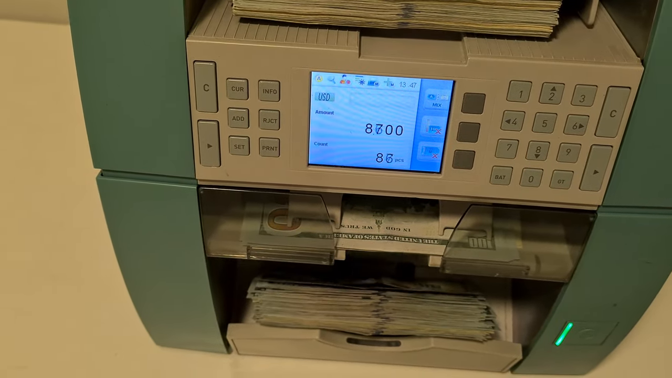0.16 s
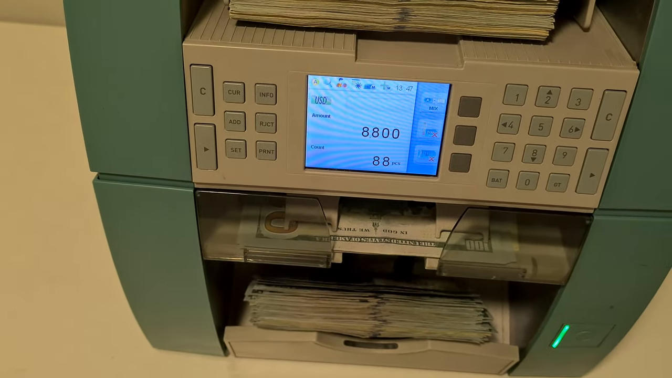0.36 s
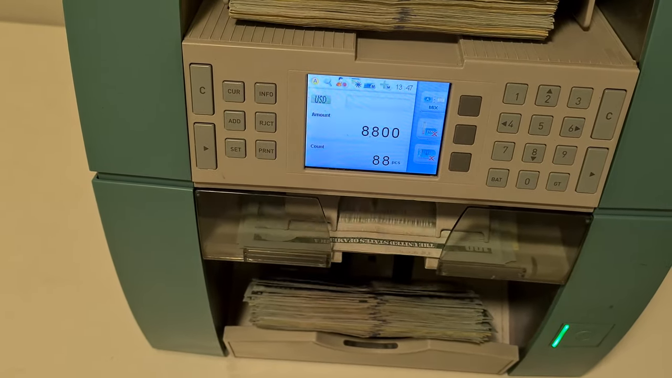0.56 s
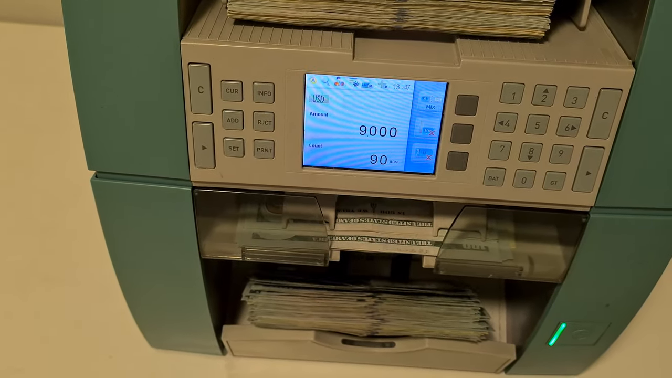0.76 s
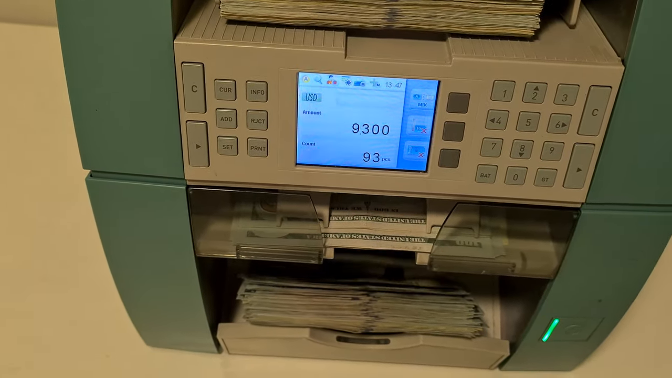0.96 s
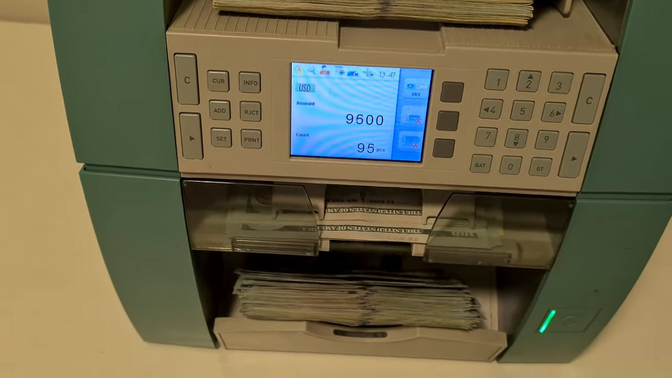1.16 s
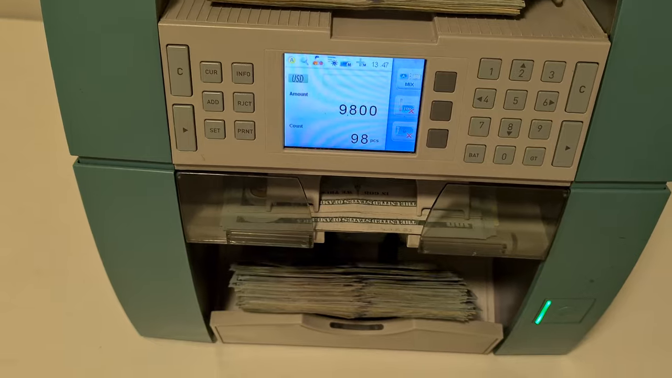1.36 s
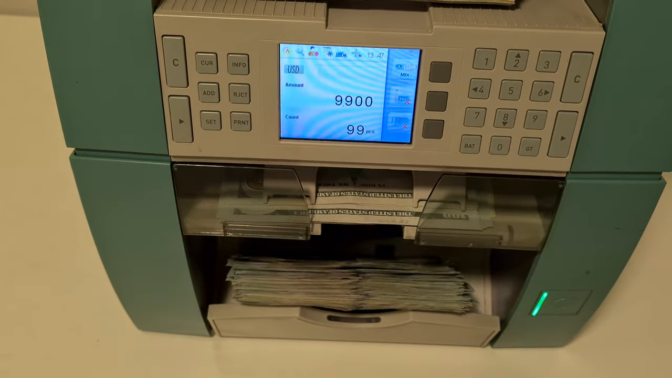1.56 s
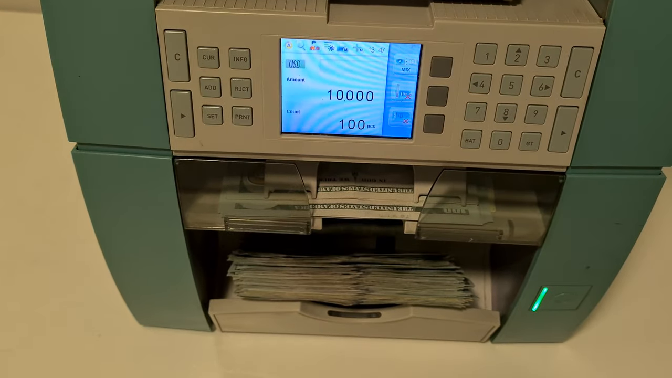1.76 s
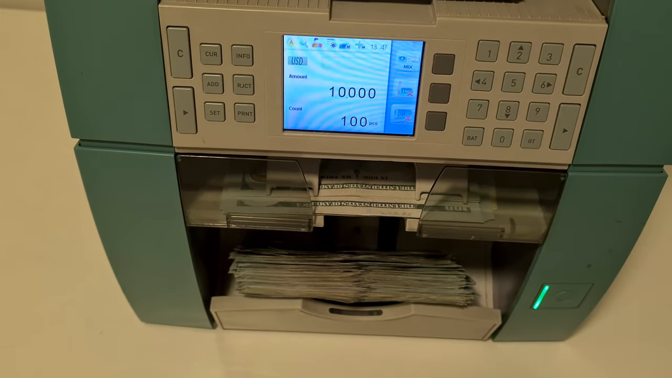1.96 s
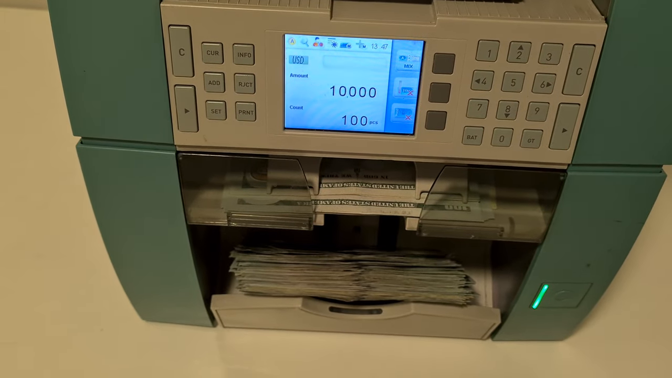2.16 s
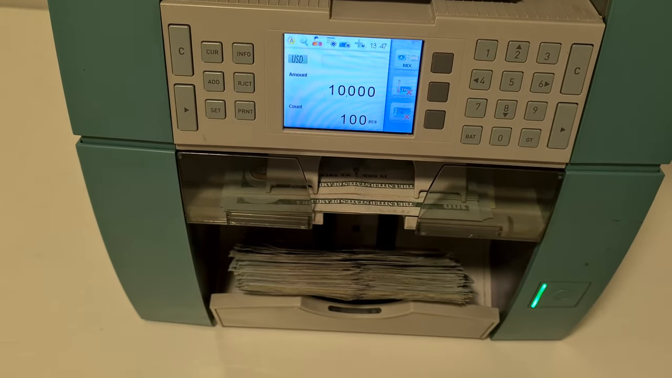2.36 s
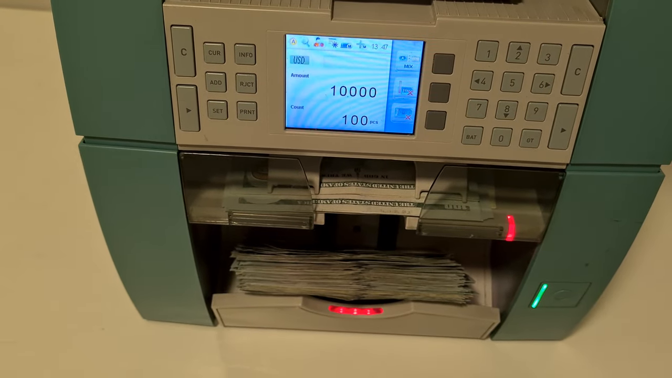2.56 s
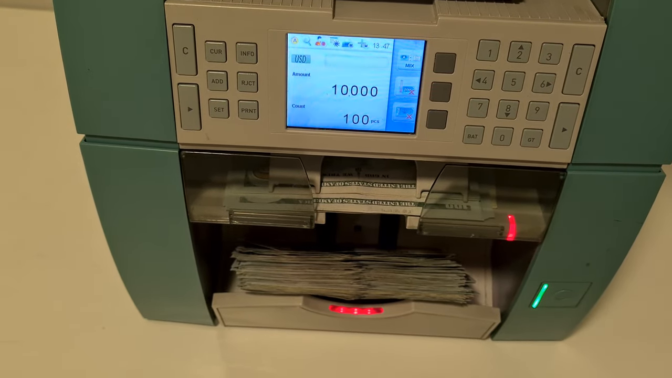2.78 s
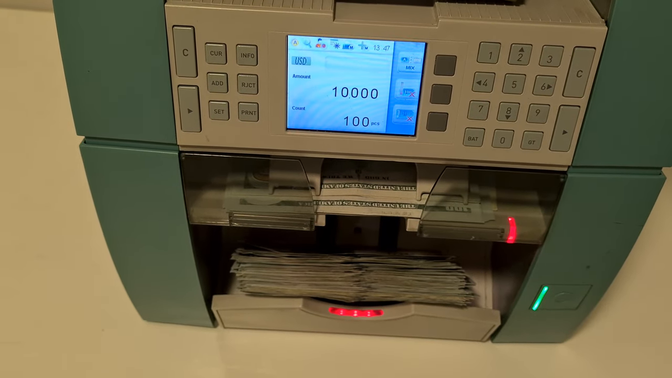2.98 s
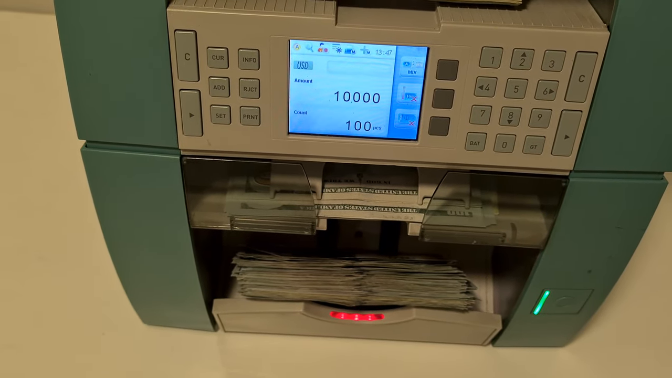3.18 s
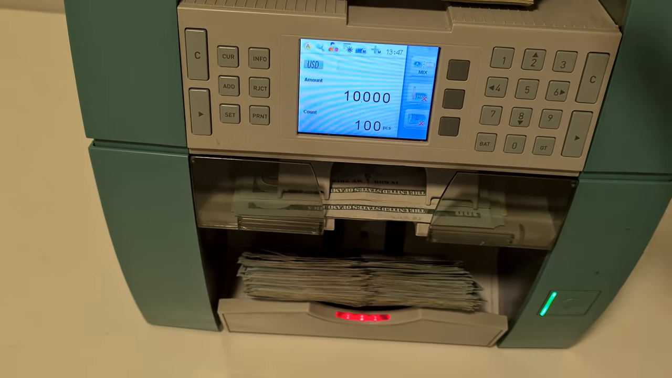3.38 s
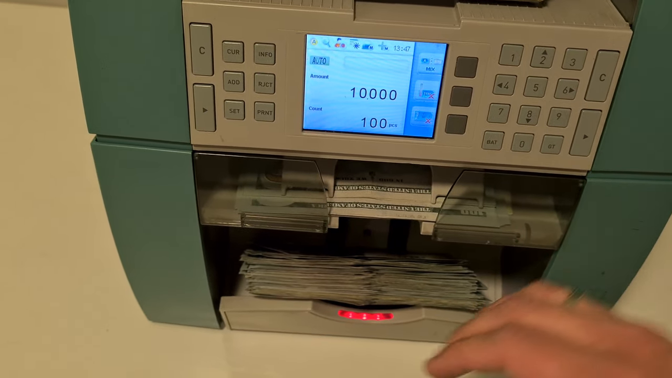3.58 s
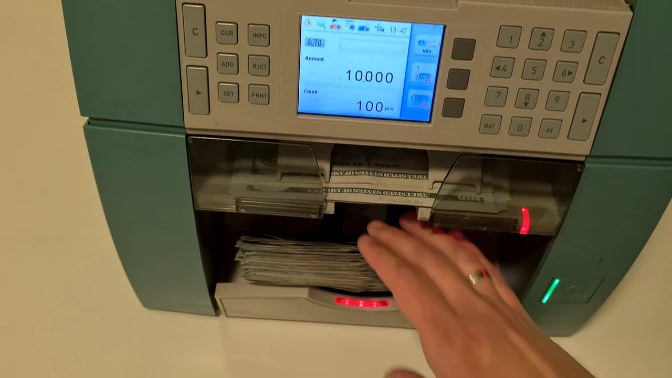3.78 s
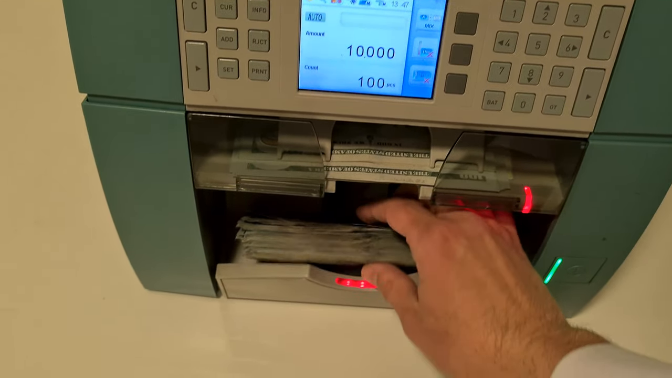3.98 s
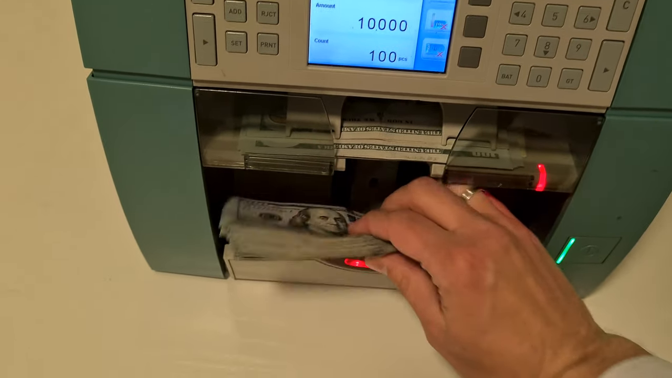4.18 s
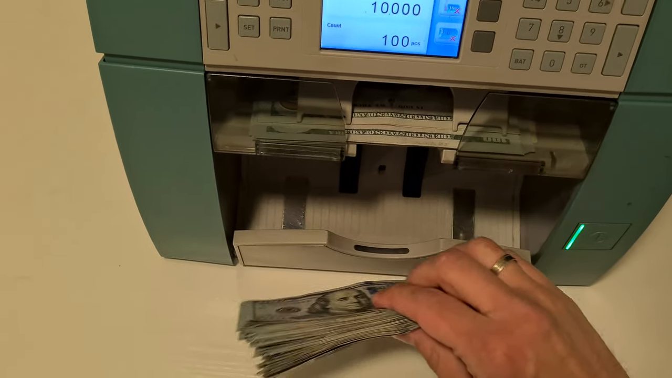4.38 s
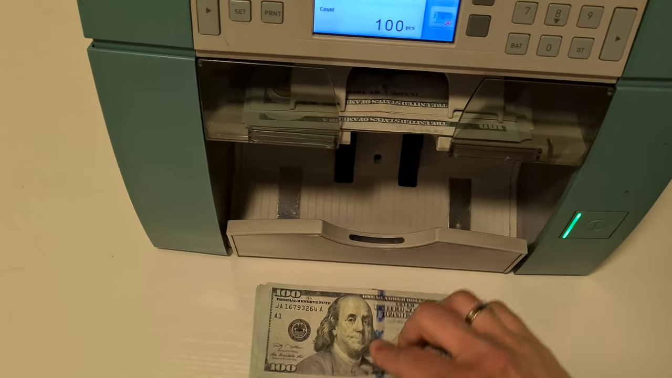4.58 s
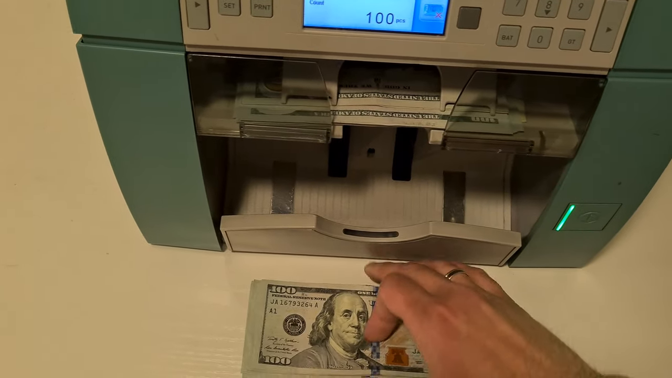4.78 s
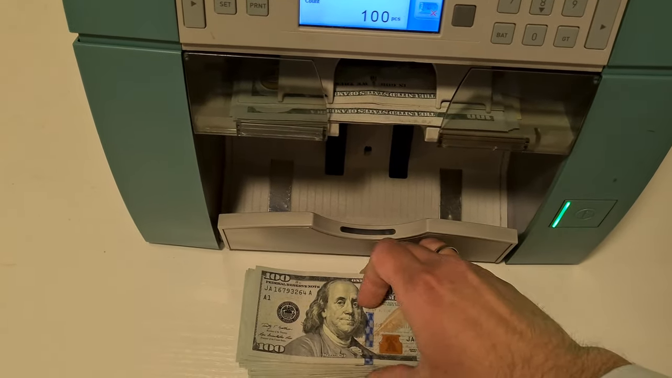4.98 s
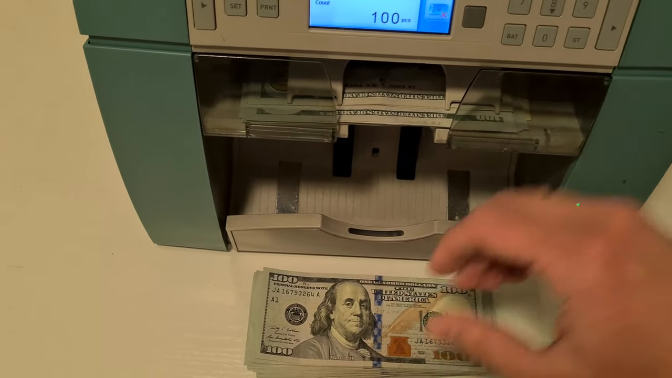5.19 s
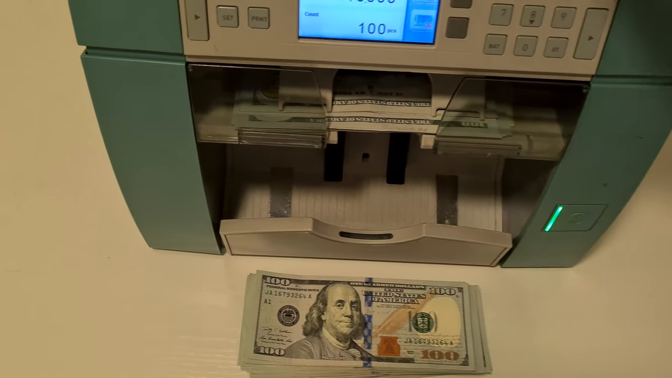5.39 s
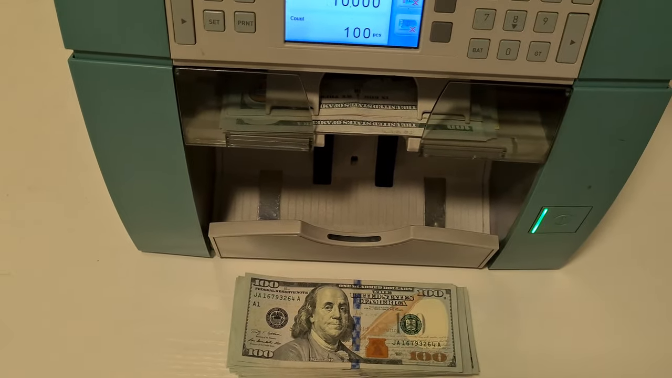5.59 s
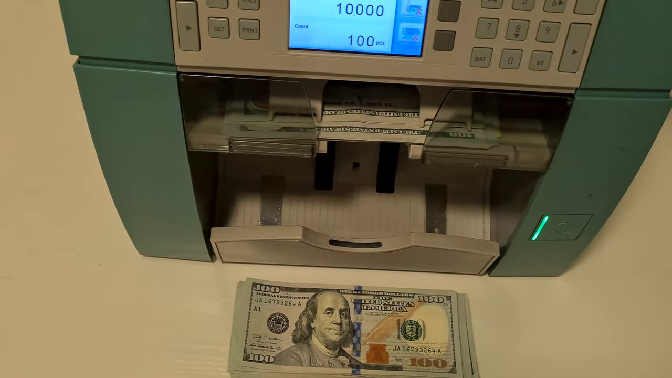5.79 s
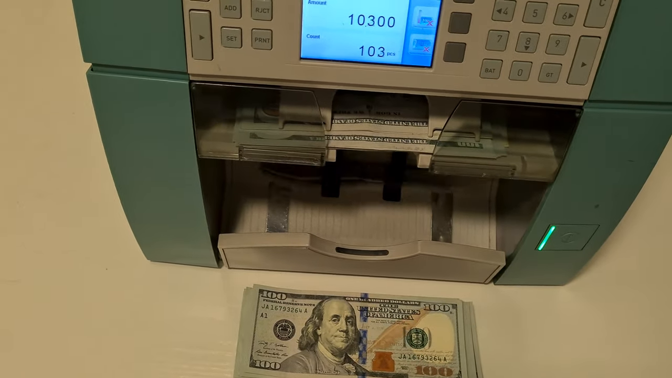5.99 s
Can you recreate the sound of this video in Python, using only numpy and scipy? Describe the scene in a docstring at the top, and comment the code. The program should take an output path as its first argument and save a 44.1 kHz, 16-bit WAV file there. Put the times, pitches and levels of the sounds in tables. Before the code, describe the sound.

In a quiet office with a soft ventilation hum, paper money riffles quickly through a nearby counting machine, each bill landing with a small thump over the whirring drive. The paper runs out and the motor winds down. Fingers tap the stack and bump it against the plastic tray, several sharp metallic clacks follow, then the motor spins up and bills rush through once more.

```python
"""Banknote counter in a quiet office

Gears rattle in a plastic case; each note flutters through, snaps past the rollers and thumps into the
stacker, and a metal gate clacks now and then. The batch ends; the drive idles and coasts to a stop,
a loose part ticking. A hand draws the bundle out, the desk booms softly, the gate clacks five times,
the drive restarts and notes run again. Ventilation rumbles throughout."""
import sys
import numpy as np
from scipy import signal
from scipy.fft import rfft, irfft, next_fast_len
from scipy.io import wavfile

SR = 44100
rng = np.random.default_rng(int(sys.argv[2]) if len(sys.argv) > 2 else 0)


def bounce(signal):
    """Save signal as a 16-bit WAV file at the path given by the first command-line argument."""
    frames = np.transpose(np.atleast_2d(signal))
    limited = np.clip(frames, -1, 1)
    pcm = np.round(limited * 32767).astype(np.int16)
    wavfile.write(sys.argv[1], SR, pcm)


N = 266364
TIME = np.arange(N) / SR
FFT_SIZE = next_fast_len(N + SR // 2, True)
HZ = np.maximum(np.arange(FFT_SIZE // 2 + 1) * SR / FFT_SIZE, 1)


def from_db(db):
    """Gain of a level in dB."""
    return 10 ** (np.asarray(db) / 20)


def at_hz(points):
    """A (Hz, value) table on the whole frequency grid."""
    return np.interp(np.log(HZ), np.log(np.array(points)[:, 0]), np.array(points)[:, 1])


def level(runs):
    """Gain over time from runs of (s, dB) points, silent outside them."""
    return sum(from_db(np.interp(TIME, *np.transpose(run), left=-150, right=-150)) for run in runs)


def drift(rate_hz):
    """Smooth random wander of standard deviation 1."""
    step = 16
    pole = np.exp(-2 * np.pi * rate_hz * step / SR)
    slow = signal.lfilter([1], [1, -2 * pole, pole * pole], rng.standard_normal(N // step + 3002))[3000:]
    return np.interp(np.arange(N) / step, np.arange(len(slow)), slow / slow.std())


def tone(hz, waver_hz, rate_hz):
    """A sine of rms 1 whose pitch wanders."""
    return np.sqrt(2) * np.sin(2 * np.pi * np.cumsum(hz + waver_hz * drift(rate_hz)) / SR)


def bursts(starts_s, db, rise_s, fall_s):
    """Envelope of contacts that rise linearly and decay exponentially."""
    out = np.zeros(N)
    for start_s, gain, decay_s in zip(starts_s, from_db(db), np.broadcast_to(fall_s, len(starts_s))):
        t = np.arange(round((rise_s + 8 * decay_s) * SR)) / SR
        shape = np.minimum(t / rise_s, 1) * np.exp(-np.maximum(t - rise_s, 0) / decay_s)
        piece = out[round(start_s * SR):][:len(t)]
        piece += gain * shape[:len(piece)]
    return out


def contacts(rough_db):
    """Two independent dense streams of tiny uneven contacts; rms 1."""
    grains = rng.standard_normal((2, N)) * from_db(rough_db * drift(500))
    return grains / grains.std()


# Stereo width. Each row: frequency in Hz, side minus mid in dB.
STEREO_WIDTH = [(60, -20.5), (110, -14), (200, -28), (380, -11), (700, -6.5), (1290, -2), (2380, -1.5),
                (4400, -0.5), (8120, 1.5), (15000, -0.5)]
# Stereo balance. Each row: frequency in Hz, left minus right in dB.
STEREO_BALANCE = [(60, -1), (110, -2.5), (200, -3), (380, -2), (700, -2.5), (1290, 1), (2380, 1),
                  (4400, 1.5), (8120, 2), (15000, -2)]

def colour(pair, spectrum, peaks=()):
    """Causal filter of unit noise gain; the two streams then become stereo mid and side."""
    db = at_hz(spectrum) + sum(lift / (1 + (2 * (HZ - hz) / width) ** 2) for hz, width, lift in peaks)
    cepstrum = irfft(db * np.log(10) / 20, FFT_SIZE)
    cepstrum[1:FFT_SIZE // 2] *= 2   # fold to minimum phase
    cepstrum[FFT_SIZE // 2 + 1:] = 0
    response = np.exp(rfft(cepstrum)) / np.sqrt(np.mean(from_db(db) ** 2))
    mid, side = rfft(pair, FFT_SIZE) * response
    side = side * from_db(at_hz(STEREO_WIDTH))
    tilt = from_db(at_hz(STEREO_BALANCE) / 2)
    return irfft([(mid + side) * tilt, (mid - side) / tilt], FFT_SIZE)[:, :N]


# Paper feed, one list a batch. Each row: time in seconds, flutter level in dB.
PAPER_FEED = [
    [(0.0, -14.5), (0.326, -20.5), (1.308, -20), (1.674, -32.5), (1.78, -38)],
    [(5.62, -34.5), (5.73, -22.5), (5.878, -16.5), (6.04, -21.5)],
]
# Banknotes, about 13 a second. Each row: start in seconds, leading snap, trailing snap and thump in dB.
BANKNOTES = [(0.051, -38, -28, -15), (.129, -19, -27, -9), (.202, -18.5, -30, -12.5),
             (.282, -16.5, -32.5, -9), (0.355, -35, -53, -9), (0.426, -38, -42, -31),
             (.514, -24.5, -35.5, -13.5), (0.591, -23.5, -32, -12.5), (0.664, -33, -26, -9),
             (.741, -16, -22.5, -10), (0.816, -17.5, -17, -12.5), (0.892, -14.5, -29.5, -11.5),
             (0.971, -18.5, -54, -10), (1.043, -22.5, -39, -11), (1.12, -19.5, -37, -9),
             (1.201, -17.5, -30, -11), (1.277, -22, -26.5, -13.5), (1.352, -15.5, -29, -8),
             (1.424, -23, -15, -18), (1.494, -22, -29, -20), (1.572, -19, -35, -14.5),
             (1.649, -17.5, -22, -12.5), (5.712, -16.5, -43.5, -14), (5.783, -18, -39.5, -7.5),
             (5.864, -14, -26.5, -16.5), (5.942, -23.5, -46, -13.5), (6.013, -14, -20, -20)]
# Plastic case resonances. Each row: frequency in Hz, width in Hz, lift in dB.
CASE_MODES = [(237, 48, 5), (304, 43, -0.5), (383, 32, 8.5), (447, 21, 6), (720, 120, 2), (858, 40, 2.5),
              (1345, 83, 6), (1750, 210, 4), (2036, 290, 4.5), (2850, 150, 1.5)]
# Paper flutter. Each row: frequency in Hz, relative density in dB.
FLUTTER_SPECTRUM = [(53, -27.5), (90, -9.5), (184, -17), (224, 3.5), (385, 1.5), (581, -13), (753, -3.5),
                    (1350, -9.5), (2430, -21.5), (11100, -27), (16000, -31)]

def paper_flutter():
    """Paper flutters through, swelling with each note; the loaded rollers whine."""
    feed = level(PAPER_FEED)
    pass_s, pass_lift_db = 0.03, 2.5
    corners_s = pass_s * np.array([-0.2, 0, 0.9, 1.3])
    passing = sum(np.interp(TIME, note[0] + corners_s, [0, 1, 1, 0]) for note in BANKNOTES)
    swell = from_db(1.18 * drift(32) + pass_lift_db * (passing - 0.5))
    flutter = colour(feed * swell * contacts(rough_db=3.5), FLUTTER_SPECTRUM, CASE_MODES)
    whine = feed * from_db(-24 + 2.8 * drift(5.9)) * tone(381, waver_hz=8.9, rate_hz=22)
    return flutter + whine


POWER_OFF_S, COAST_S, RESTART_S, SPIN_UP_S = 2.28, 0.46, 5.03, 0.1
WHINE_SAG = 0.12   # pitch follows speed to this power

def speed():
    """Roller speed, 0 to 1: full, slowing evenly, at rest, spinning up."""
    return np.clip(np.maximum(1 - (TIME - POWER_OFF_S) / COAST_S, (TIME - RESTART_S) / SPIN_UP_S), 0, 1)


def drive_gain(idle_db, restart_db, load_db, hold_s, fade_db_per_s, coast_db):
    """Gain of a drive layer: steady under power, shifted by paper load, faint while coasting."""
    unloaded_db, load_span_db = -33.5, 14
    load = np.clip((20 * np.log10(level(PAPER_FEED)) - unloaded_db) / load_span_db, 0, 1)
    powered = from_db(-fade_db_per_s * np.maximum(TIME - POWER_OFF_S - hold_s, 0))
    first_run = from_db(idle_db) * (powered + from_db(coast_db) * speed())
    second_run = from_db(restart_db) * speed() ** 1.23
    return np.where(TIME < RESTART_S, first_run, second_run) * from_db(load_db * load)


# Gear and belt rattle. Each row: frequency in Hz, relative density in dB.
RATTLE_SPECTRUM = [(260, -30), (450, -9.5), (589, -10.5), (794, -2), (1020, -11), (1360, -13),
                   (2160, -20.5), (3000, -16.5), (3280, -20), (4840, -25.5), (5710, -31), (9920, -33),
                   (15100, -42), (16000, -52)]
# Motor tones. Each row: frequency in Hz, level in dB relative to the rattle.
MOTOR_TONES = [(122.5, -20.5), (156, -17.5)]

def drive_rattle():
    """Gears and belts rattle the case; the motor hums under them."""
    gain = drive_gain(idle_db=-28.5, restart_db=-27, load_db=5,
                      hold_s=0.0087, fade_db_per_s=165, coast_db=-23.5)
    shaking = gain * from_db(0.68 * drift(25)) * contacts(rough_db=1.5)
    hum = sum(from_db(db) * tone(hz, waver_hz=1.456, rate_hz=3) for hz, db in MOTOR_TONES)
    return colour(shaking, RATTLE_SPECTRUM, CASE_MODES) + gain * hum


# Drive rumble. Each row: frequency in Hz, relative density in dB.
RUMBLE_SPECTRUM = [(53, -48), (90, -14.5), (113, -17), (173, -3.5), (235, 3), (270, 3), (550, -5),
                   (720, -23), (1210, -120)]

def drive_rumble():
    """The drive shakes the case with a rough rumble and a low whine."""
    gain = drive_gain(idle_db=-32, restart_db=-31, load_db=6,
                      hold_s=0.125, fade_db_per_s=600, coast_db=-19)
    shaking = gain * from_db(1.5 * drift(11)) * contacts(rough_db=5.5)
    whine = from_db(-5 + 1.35 * drift(19)) * tone(236 * speed() ** WHINE_SAG, waver_hz=3.13, rate_hz=11)
    return colour(shaking, RUMBLE_SPECTRUM, CASE_MODES) + gain * whine


# Gear mesh tones. Each row: full-speed frequency in Hz, waver in Hz, relative level in dB.
MESH_TONES = [(779, 8.99, -3), (1335, 8, -22), (2800, 60, -19)]

def gear_whine():
    """Gears whine at their mesh rates, sagging in pitch as they slow."""
    gain = drive_gain(idle_db=-31.5, restart_db=-30.5, load_db=-7,
                      hold_s=0.01, fade_db_per_s=600, coast_db=-40)
    whine = 0
    for hz, waver_hz, db in MESH_TONES:
        flicker = from_db(db + 2 * drift(13) + 2.6 * drift(40))
        whine += flicker * tone(hz * speed() ** WHINE_SAG, waver_hz, rate_hz=14.1)
    return gain * speed() ** 2 * whine


# Ventilation air. Each row: frequency in Hz, relative density in dB.
AIR_SPECTRUM = [(21, -35), (31, 0), (41, -10.5), (72, -9), (96, -12), (180, -28.5), (269, -21.5),
                (321, -27.5), (359, -16), (384, -24.5), (411, -19), (502, -27.5), (1070, -32), (1370, -38),
                (3210, -50.5), (7500, -68), (9750, -105), (16500, -120)]
# Fan peaks and dips. Each row: frequency in Hz, width in Hz, lift in dB.
FAN_PEAKS = [(143, 5.5, 5.5), (297.4, 8.3, 8), (386, 4.7, -3.5), (420, 14, -7.5), (626, 10, 11),
             (1084, 8.6, 13)]

def office():
    """Ventilation rumble with narrow fan tones over the building's deep hum."""
    air = from_db(-42.5 + 1.5 * drift(2.4)) * colour(rng.standard_normal((2, N)), AIR_SPECTRUM, FAN_PEAKS)
    hum = from_db(-50.5 + 1.1 * drift(2.5)) * tone(29, waver_hz=0.9, rate_hz=2.63)
    return air + hum * from_db([[-1.3], [1.3]])


# Notes slapping out of step. Each row: start in seconds, snap in dB, thump in dB.
STRAY_SLAPS = [(0.013, -21.5, -10.5), (0.325, -24.5, -25.5), (0.479, -15, -11), (0.779, -25.5, -9),
               (5.898, -29, -15)]
# Edge snap and stacker thump. Each row: frequency in Hz, relative density in dB.
SNAP_SPECTRUM = [(710, -19.5), (1200, 4.5), (2450, -17), (2890, -7.5), (5410, -16), (11100, -25),
                 (16000, -34)]
THUMP_SPECTRUM = [(65, -37), (110, -25), (226, -1.5), (386, 0.5), (571, -5.5), (751, -5.5), (1350, -9),
                  (2500, -22), (3250, -46.5), (5500, -120)]

def note_impacts():
    """Both edges of each note snap at the rollers; it lands in the stacker with a dull thump."""
    start_s, lead_db, trail_db, land_db = np.transpose(BANKNOTES)
    slap_s, slap_snap_db, slap_thump_db = np.transpose(STRAY_SLAPS)
    trail_s, land_s = start_s + 0.02, start_s + 0.0065
    scatter = rng.standard_normal((3, len(start_s)))
    midway_s = start_s + 0.043 + 0.0037 * scatter[0]   # a weak contact between notes

    snap_s = np.r_[start_s, trail_s, slap_s, midway_s]
    snap_db = np.r_[lead_db, trail_db, slap_snap_db, -33 + 5 * scatter[1]]
    snaps = bursts(snap_s - 0.003, snap_db, rise_s=0.0021, fall_s=0.0088) * contacts(rough_db=1.5)

    thump_s = np.r_[land_s, slap_s, midway_s]
    thump_db = np.r_[land_db, slap_thump_db, -26.5 + 5 * scatter[2]]
    thumps = bursts(thump_s, thump_db, rise_s=0.0044, fall_s=0.0071) * contacts(rough_db=2)
    return colour(snaps, SNAP_SPECTRUM) + colour(thumps, THUMP_SPECTRUM, CASE_MODES)


# Gate clacks. Each row: start in seconds, strike, ring and knock in dB, decay in seconds,
# 0 for closing or 1 for opening.
GATE_CLACKS = [(.342, -20.5, -34, -19.5, 0.018, 0), (0.645, -27.5, -20, -20, 0.029, 1),
               (4.506, -18.5, -43, -16.5, 0.021, 0), (4.552, -21, -37, -17.5, 0.017, 1),
               (4.641, -19.5, -41, -16.5, 0.026, 0), (4.734, -22.5, -19, -16.5, 0.017, 1),
               (4.823, -17, -37, -16, 0.02, 0), (5.845, -21.5, -21, -13, 0.016, 1)]
# Housing knock and bright crack. Each row: frequency in Hz, relative density in dB.
KNOCK_SPECTRUM = [(71, -45), (120, -7), (307, -4), (449, -3), (585, -10), (1290, -3.5), (1760, -11.5),
                  (2070, -12), (4000, -18), (5200, -32), (8800, -120)]
CRACK_SPECTRUM = [(880, -36), (1500, -12), (4120, -12), (6430, -8.5), (8160, -12), (11300, -6.5),
                  (14900, -15), (16000, -11)]
# Housing and steel strike resonances. Each row: frequency in Hz, width in Hz, lift in dB.
HOUSING_MODES = [(222.5, 27, 7.5), (388, 24, 3.5), (443, 46, 8.5), (860, 89, 4), (1400, 380, 3.5),
                 (1940, 170, 9), (3280, 520, 6.5)]
STRIKE_MODES = [(2100, 300, 3), (5450, 400, 3), (6450, 350, 4.5)]
# Quickly damped steel modes. Each row: frequency in Hz, width in Hz, closing and opening lift in dB.
RING_MODES = [(3300, 400, 8, 6), (5410, 350, 8, 4), (6450, 350, 11, 9), (9700, 500, 11, 4),
              (10800, 600, 3, 15), (11700, 600, 12, 5)]

def gate():
    """Steel strikes bright and rings briefly, differently each way; the housing knocks lower, later."""
    start_s, strike_db, ring_db, knock_db, decay_s, opening = np.transpose(GATE_CLACKS)
    knock = bursts(start_s + 0.004, knock_db, rise_s=0.0062, fall_s=1.21 * decay_s)
    out = colour(knock * contacts(rough_db=-1), KNOCK_SPECTRUM, HOUSING_MODES)
    steel = contacts(rough_db=2)
    strike = bursts(start_s, strike_db, rise_s=0.004, fall_s=decay_s)
    out += colour(strike * steel, CRACK_SPECTRUM, STRIKE_MODES)
    for way in (0, 1):
        chosen = opening == way
        modes = [(hz, width_hz, lifts_db[way]) for hz, width_hz, *lifts_db in RING_MODES]
        ring = bursts(start_s[chosen], ring_db[chosen], rise_s=0.002, fall_s=0.004)
        out += colour(ring * steel[::-1], CRACK_SPECTRUM, modes)
    return out


# Loose metal part's resonances. Each row: frequency in Hz, width in Hz, lift in dB.
LOOSE_MODES = [(6570, 400, 14), (7600, 400, 6), (9500, 600, 11), (11450, 500, 12), (12100, 600, 15),
               (14200, 600, 0)]

def loose_part():
    """A loose part touches, then ticks and shivers, once in each of the rollers' last turns."""
    turns, turns_per_s, peak_db, spread_db = 8, 28.3, -47, 3.5
    tick_turns_left = 0.119 + np.arange(turns)
    turns_left = np.r_[tick_turns_left, tick_turns_left + 0.14]   # ticks, then their leading touches
    start_s = POWER_OFF_S + COAST_S - np.sqrt(2 * COAST_S * turns_left / turns_per_s)
    touch_db = peak_db + 20 * np.log10(speed()[(start_s[turns:] * SR).astype(int)])
    db = np.r_[np.full(turns, peak_db), touch_db] + spread_db * rng.standard_normal(2 * turns)
    tick = bursts(start_s, db, rise_s=0.0006, fall_s=0.0019)
    shiver = bursts(start_s, db - 16, rise_s=0.002, fall_s=0.025)
    strikes = (tick + shiver) * rng.standard_normal((2, N))
    return colour(strikes, [(1000, -12), (2500, 10), (6000, -6), (16000, -2)], LOOSE_MODES)


# Fingertips on the bundle. Each row: start in seconds, level before filtering in dB, pitch in Hz.
FINGER_TAPS = [(3.95, -42.5, 1070), (3.982, -31, 1470), (4.097, -40, 3300), (4.104, -30, 3060),
               (4.129, -36, 3000), (4.169, -22, 1110)]
# Paper sliding under the hand, one run. Each row: time in seconds, level in dB.
PAPER_SLIDE = [
    [(4.088, -85), (4.098, -60), (4.14, -69), (4.19, -62), (4.21, -73)],
]
# Bundle against the tray. Each row: start in seconds, knock in dB, scuff in dB, decay in seconds.
TRAY_KNOCKS = [(4.2, -25.5, -39, 0.026), (4.237, -22, -34.5, 0.019)]
# Tray knock. Each row: frequency in Hz, relative density in dB.
TRAY_SPECTRUM = [(47, -44.5), (80, -7.5), (302, -7.5), (371, -6.5), (581, -15.5), (1040, -6.5),
                 (1450, -17.5), (2000, -12.5), (2600, -20), (7000, -30), (9100, -35), (15400, -120)]
# Tray resonances. Each row: frequency in Hz, width in Hz, lift in dB.
TRAY_MODES = [(215, 30, 8), (375, 40, 6), (1050, 250, 3), (2050, 200, 7), (3000, 200, 5)]

def hand():
    """Fingertips tap the bundle, paper slides, then the bundle knocks the tray on its way out."""
    touch = contacts(rough_db=2)
    taps = 0
    for tap_s, db, hz in FINGER_TAPS:
        band = signal.butter(2, [0.75 * hz, 1.22 * hz], "band", fs=SR, output="sos")
        taps += signal.sosfilt(band, bursts([tap_s], [db], rise_s=0.0014, fall_s=0.0058) * touch + 1e-18)
    start_s, knock_db, scuff_db, decay_s = np.transpose(TRAY_KNOCKS)
    knocks = bursts(start_s, knock_db, rise_s=0.0032, fall_s=decay_s) * touch
    scuffs = level(PAPER_SLIDE) + bursts(start_s, scuff_db, rise_s=0.0038, fall_s=0.35 * decay_s)
    return taps + colour(knocks, TRAY_SPECTRUM, TRAY_MODES) + colour(scuffs * touch[::-1], CRACK_SPECTRUM)


# Desk booms. Each row: start in seconds, hold in seconds, level in dB.
DESK_BOOMS = [(4.224, .06, -47), (4.568, 0.39, -41.5), (5.063, 0.032, -43)]

def desk():
    """The desk top booms softly as the bundle is drawn out and set down and the drive jolts on."""
    band = signal.butter(2, [55, 100], "band", fs=SR, output="sos")
    boom = signal.sosfilt(band, rng.standard_normal(N))
    edge_s = 0.018
    shape = sum(from_db(db) * np.interp(TIME, np.cumsum([start_s, edge_s, hold_s, edge_s]), [0, 1, 1, 0])
                for start_s, hold_s, db in DESK_BOOMS)
    return shape * boom / boom.std()


# Room decay. Each row: frequency in Hz, time to fall 60 dB in seconds.
ROOM_DECAY = [(100, 0.77), (400, 0.74), (1000, 0.67), (3000, 0.73), (6000, 0.59), (9000, 0.43),
              (13000, 0.3), (16000, 0.1)]

def room(dry):
    """Diffuse reflections that die faster in the treble; one tail for the mid, one for the side."""
    t = np.arange(SR // 2) / SR
    edges_hz = np.r_[60 * 2.0 ** np.arange(8), 10900, 15400]
    tails = 0
    for low_hz, high_hz in zip(edges_hz, edges_hz[1:]):
        band = signal.butter(2, [low_hz, high_hz], "band", fs=SR, output="sos")
        noise = signal.sosfilt(band, rng.standard_normal((2, len(t))))
        t60_s = at_hz(ROOM_DECAY)[round(np.sqrt(low_hz * high_hz) * FFT_SIZE / SR)]
        tails += noise * from_db(-60 * t / t60_s) * np.minimum(t / 0.004, 1)
    tails /= np.sqrt(np.sum(tails ** 2, axis=1, keepdims=True))
    mid_side = np.array([dry[0] + dry[1], dry[0] - dry[1]]) / 2
    mid, side = irfft(rfft(mid_side, FFT_SIZE) * rfft(tails, FFT_SIZE), FFT_SIZE)[:, :N]
    return np.array([mid + side, mid - side])


def scene():
    """The machine and the hand in the room, over the office air."""
    drive = drive_rattle() + drive_rumble() + gear_whine()
    near = drive + paper_flutter() + note_impacts() + gate() + hand()
    return near + from_db(-9) * room(near) + office() + loose_part() + desk()


def record(dry):
    """Soft saturation, then a steep treble cut."""
    stop_hz = 15950
    lowpass = signal.cheby2(24, 60, stop_hz, fs=SR, output="sos")
    return signal.sosfilt(lowpass, 1.178 * np.tanh(dry / 1.34))


dry = scene()
out = record(dry)
bounce(out)
```